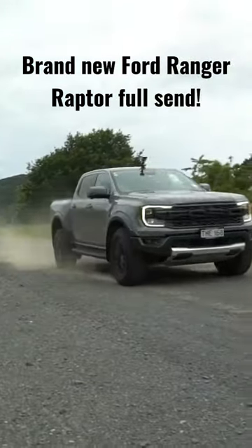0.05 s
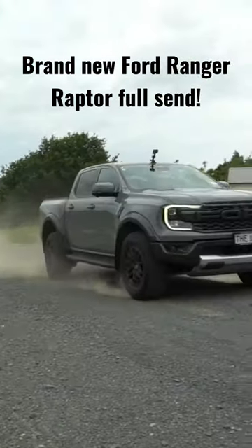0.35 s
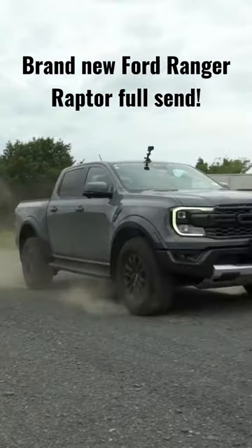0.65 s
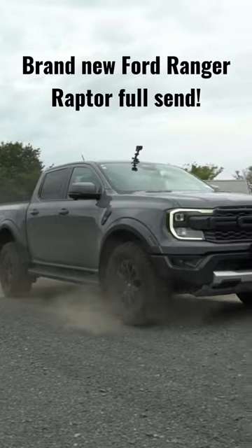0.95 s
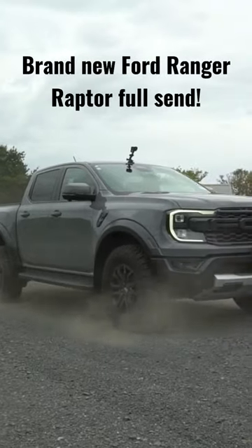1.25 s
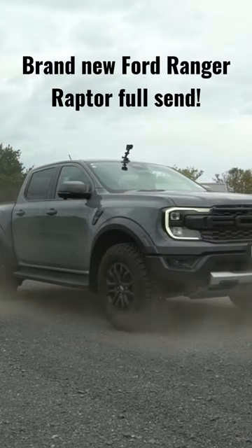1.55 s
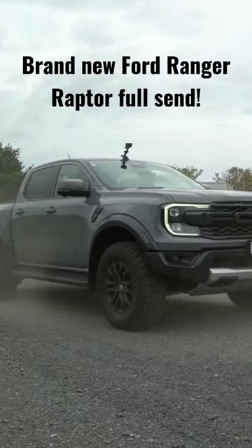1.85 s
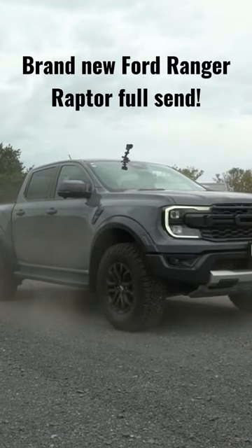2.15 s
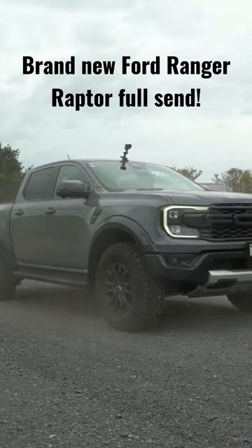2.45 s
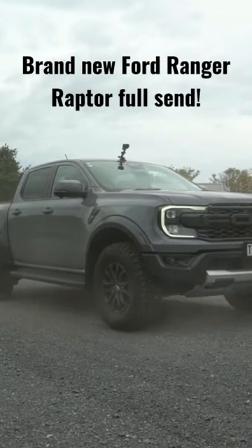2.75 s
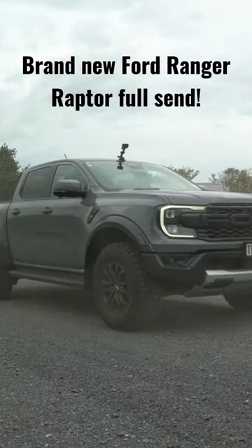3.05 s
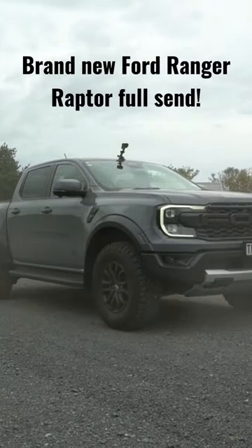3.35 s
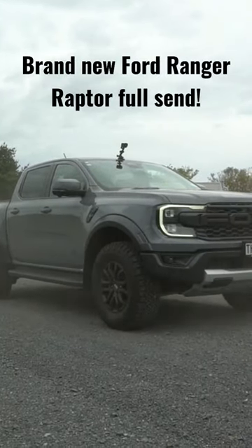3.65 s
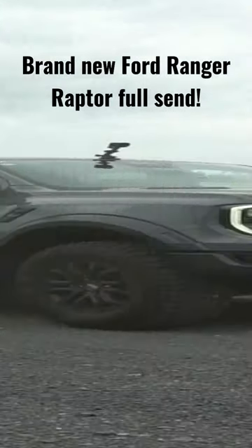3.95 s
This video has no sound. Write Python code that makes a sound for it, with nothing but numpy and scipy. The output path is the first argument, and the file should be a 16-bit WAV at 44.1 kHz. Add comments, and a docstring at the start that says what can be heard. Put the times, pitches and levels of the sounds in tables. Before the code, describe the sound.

Tyres skid on gravel with a loud, grinding crunch from the start, with stones popping underneath. Around 0.8 seconds the tread groans briefly and grit sprays. The crunch fades from about 1 second and is gone before 2 as the pickup truck stops. Its engine then idles with a quieter, throbbing hum until 4 seconds, with a soft wind rumble and very faint, distant bird chirps.

```python
"""A loud crunch of sliding gravel dies away into a throbbing idle: a pickup brakes hard in a yard.
Stones grind under the locked tyres and drive the tyre walls into resonance; the tread groans by
stick-slip, sand sprays, and single stones knock and pop as the truck settles. The six-cylinder engine
hums at harmonics of its cycle while its injectors tick. A breeze and a distant bird lie behind."""
import sys
import numpy as np
from scipy import signal
from scipy.fft import rfft, irfft
from scipy.io import wavfile
from scipy.ndimage import uniform_filter1d

SR = 44100
rng = np.random.default_rng(int(sys.argv[2]) if len(sys.argv) > 2 else 0)


def waveform_to_disk(signal):
    """Save audio, clipped to [-1, 1], as 16-bit WAV at the path in sys.argv[1]."""
    frames = np.transpose(np.atleast_2d(signal))
    scaled = np.clip(frames, -1, 1) * 32767
    samples = np.round(scaled).astype(np.int16)
    wavfile.write(sys.argv[1], SR, samples)


N = 176400

# engine speed and exhaust hum: time_s, firing_hz, level_db
ENGINE_RUN = [(0, 110.6, -38.5), (.6, 104, -66), (.92, 94, -46), (1.02, 88.1, -29.5), (1.12, 95, -37.5),
              (1.24, 106.8, -40), (1.45, 105.6, -35), (1.6, 100.1, -32.5), (2.05, 100.5, -33),
              (2.3, 98.56, -33), (2.7, 98.66, -32), (3.05, 97.9, -32.5), (3.6, 98.86, -33),
              (4, 100.2, -34.5)]
CYLINDERS = 6


def gravel():
    """Superposition of impacts: thousands of stone and grit contacts merge into a grinding noise."""
    # the slide: time_s, coarse_db, fine_db
    slide = [(0, -22, -40), (.12, -23.5, -45), (.18, -21, -43.5), (.45, -21, -42.5), (.7, -21, -44),
             (.81, -21.5, -35.5), (.88, -26, -43.5), (.97, -26, -39.5), (1.05, -30.5, -51.5),
             (1.19, -35, -58), (1.3, -40.5, -58.5), (1.5, -44, -64), (1.66, -52, -75), (1.77, -47.5, -78),
             (1.92, -54.5, -83)]
    # spectrum of coarse stones: frequency_hz, gain_db
    coarse_spectrum = [(30, -10.5), (100, -11), (200, -8), (300, -5.5), (420, -2), (550, -3), (900, -3.5),
                       (1080, -8), (1300, -6.5), (1500, -11), (1950, -11.5), (2100, -16.5), (2350, -15.5),
                       (2800, -19.5), (3450, -21), (5000, -34.5), (7000, -45.5), (8200, -45), (10000, -51),
                       (15000, -56)]
    # spectrum of fine grit: frequency_hz, gain_db
    fine_spectrum = [(300, -13), (1500, -9), (3000, 1.5), (3500, 5.5), (3850, 4), (4300, 6), (5150, -0.5),
                     (5450, -1.5), (6600, -9), (7700, -12.5), (8400, -12), (10000, -19), (13000, -16.5),
                     (15500, -20)]
    coarse_db, fine_db = curve(slide), curve(slide, axis=2)
    lurch = undb(0.47 * walk(67))  # the slide is uneven
    coarse = colour(crumble(grains(coarse_db, per_s=5000, spread_db=-0.5)), coarse_spectrum)
    fine = colour(crumble(grains(fine_db, per_s=10000, spread_db=4.5)), fine_spectrum)
    return lurch * (coarse * undb(coarse_db) + fine * undb(fine_db) + tyre_walls(coarse_db))


def tyre_walls(slide_db):
    """Forced resonance: stone contacts excite the modes of the scrubbing tyre walls, which drone."""
    # wall resonances: pitch_hz, width_hz, gain_db
    modes = [(399.5, 23.4, 3), (457, 71, -0.5), (800, 94, -16), (1280, 120, -11)]
    # strength of the drone: time_s, level_db
    scrub = [(0, -28.5), (.3, -32), (.42, -24), (.5, -31.5), (.72, -27), (.79, -25), (.84, -24),
             (.9, -32.5), (.98, -32.5), (1.06, -45), (1.2, -39.5), (1.3, -75), (1.6, -63.5)]
    slips = grains(slide_db, per_s=5000, spread_db=-0.5)
    drone = sum(undb(db) * ring(ring(slips, hz, width), hz, 3 * width) for hz, width, db in modes)
    return unit(drone) * undb(curve(scrub))


def tread_groan():
    """Stick-slip friction: the tread bites and slips in uneven cycles that slow as the wheel stops."""
    # bites of the tread: start_s, length_s, from_hz, to_hz, level_db
    bites = [(0.724, 0.1544, 456.5, 397.5, -19.5), (1.169, 0.044, 403.4, 400, -29.5)]
    out = np.zeros(N)
    jitter, flutter = 1 + 0.063 * walk(142), undb(1.5 * walk(60))
    for start, length, from_hz, to_hz, db in bites:
        progress, part = span(start, length)
        hz = (from_hz + (to_hz - from_hz) * progress) * jitter[part]
        phase = 2 * np.pi * np.cumsum(hz) / SR
        slip = np.sin(phase) + undb(-12) * np.sin(2 * phase)
        add(out, start, undb(db) * np.sin(np.pi * progress) * flutter[part] * slip)
    return out


def stones():
    """Damped impact: each larger stone gives a brief knock and a crack, muffled by the tread."""
    # stones popping under the tread: start_s, pitch_hz, level_db, knock_ms
    impacts = [(0.06, 1300, -14, 1.2), (.173, 470, -9.5, 1.6), (.192, 523, -21, 1.5),
               (0.2622, 930, -13.5, 1.6), (.263, 342, -13, 3.8), (.289, 766, -12, 1.7),
               (0.3968, 450, -9.5, 1.9), (.412, 466, -8, 2.1), (.419, 536, -8.5, 1.5),
               (0.4283, 1250, -15, 3.9), (0.4318, 646, -1.8, 1.08), (.54, 775, -13, 1.7),
               (.569, 800, -10.5, 1.9), (.6, 1220, -19, 0.86), (.785, 684, -11.5, 3),
               (0.816, 336, -17, 1.7), (.967, 457, -12, 2.2), (1.026, 533, -20, 3.2),
               (1.041, 1410, -20, 0.59), (1.096, 660, -19.5, 2), (1.1165, 1380, -17.5, 0.77),
               (1.182, 450, -23.5, 1.3), (1.214, 724, -18, 1.25), (1.2653, 1419, -25, 1.18),
               (1.2696, 850, -18.5, 1.07), (1.3045, 1280, -22.5, 0.46), (1.3905, 980, -30, 2.1),
               (1.3954, 1081, -26, 0.8), (1.574, 2000, -27.5, 0.29), (1.595, 1500, -33, 0.35),
               (1.5971, 2080, -22.5, 0.42), (1.7671, 1449, -26, 0.46), (1.7703, 1100, -38, .8),
               (1.812, 1400, -40, .6)]
    crack_hz, crack_s, crack_db, muffle_hz = 2000, 0.0031, -14, 3920
    out, t = np.zeros(N), np.arange(SR // 20) / SR
    for start, hz, db, knock_ms in impacts:
        age = t * 1000 / knock_ms
        knock = -np.sin(2 * np.pi * hz * t) * 2 * age * np.exp(1 - 2 * age)
        noise = signal.lfilter(*signal.butter(1, crack_hz, fs=SR), rng.standard_normal(len(t)))
        crack = unit(noise) * np.exp(-t / crack_s)
        add(out, start, undb(db) * (knock + undb(crack_db) * crack))
    muffled = signal.lfilter(*signal.butter(3, muffle_hz, fs=SR), out)
    return scatter(muffled, decay_s=0.014, db=-11.5)  # rattle between ground and underbody


def sand():
    """Shot noise: sand flung ahead of the wheels lands in tiny, bright random impacts."""
    # strength of the spray: time_s, level_db
    spray = [(0, -49), (.72, -66), (.81, -46), (.88, -55), (.94, -51), (1.02, -63), (1.1, -52), (1.33, -65),
             (1.5, -71), (1.8, -105)]
    # spectrum of the sand: frequency_hz, gain_db
    spectrum = [(1000, -31), (4000, 22), (7000, 8), (10000, 1), (12500, 2), (15500, -19)]
    level_db = curve(spray)
    patter = crumble(grains(level_db, per_s=900, spread_db=2.5), decay_s=.0008, db=3)
    return colour(patter, spectrum) * undb(level_db)


def chips():
    """Impact transients: small chips land nearby, each with a short tick of high noise."""
    # chips landing: start_s, level_db
    landings = [(.818, -40), (.887, -53), (.912, -40), (.942, -40), (.9655, -42), (1.078, -54),
                (1.181, -53), (1.253, -54), (1.335, -56)]
    decay_s, low_cut_hz = 0.0026, 3500
    out, t = np.zeros(N), np.arange(SR // 50) / SR
    for start, db in landings:
        add(out, start, undb(db) * rng.standard_normal(len(t)) * np.exp(-t / decay_s))
    return signal.lfilter(*signal.butter(2, low_cut_hz, "high", fs=SR), out)


def engine():
    """Periodic excitation: one slightly wavering engine cycle times exhaust, bay, injectors and valve."""
    firing_hz = curve(ENGINE_RUN)
    cycle = np.cumsum(firing_hz * (1 + 0.004 * walk(6.74))) / SR / CYLINDERS
    cycle_s = CYLINDERS / firing_hz
    return exhaust(cycle) + engine_bay(cycle) + injectors(cycle, cycle_s) + valve(cycle, cycle_s)


def exhaust(cycle):
    """Harmonic series: uneven firings hum at multiples of the cycle rate, over a resonant boom."""
    # exhaust harmonics: multiple_of_cycle_rate, gain_db
    orders = [(4, -11.5), (5, -30), (6, 0), (7, -14.5), (8, -18), (9, -24), (10, -18), (11, -36), (12, -30),
              (17, -17), (18, -31), (19, -26), (23, -32.5), (26, -33.5), (28, -32)]
    hum = 0
    for order, db in orders:
        depth = .06 if order == CYLINDERS else 0.13  # the firing tone is the steadiest
        flicker = 1 + depth * walk(6.6)
        hum = hum + undb(db) * flicker * np.sin(2 * np.pi * (order * cycle + rng.random()))
    boom = noise_band(hz=278.4, width_hz=37)
    return unit(hum) * undb(curve(ENGINE_RUN, axis=2)) + undb(-56) * boom


def engine_bay(cycle):
    """Amplitude modulation: the bay's whirr throbs at the firing rate; belt and pumps whine faintly."""
    # spectrum of the whirr: frequency_hz, gain_db
    spectrum = [(40, 8), (80, 11), (130, 6.5), (220, 1), (330, -3.5), (470, -9), (560, -21), (850, -8.5),
                (1050, -12), (1270, -15.5), (1500, -19.5), (2300, -20.5), (3200, -26), (3900, -25.5),
                (5000, -30.5), (6200, -35.5), (6800, -40.5), (10000, -43.5), (15000, -55)]
    # belt and pump whines: pitch_hz, level_db
    whines = [(468, -73), (1262, -67), (3900, -76.5)]
    throb = 1 + 0.082 * np.cos(2 * np.pi * CYLINDERS * cycle)
    whirr = colour(rng.standard_normal(N) * throb, spectrum)
    whine = sum(undb(db) * noise_band(hz, width_hz=30) for hz, db in whines)
    return undb(-43) * whirr + whine


def injectors(cycle, cycle_s):
    """Pulse train: the injectors tick twice a cycle in bursts of noise that decay exponentially."""
    # injector ticks: fraction_of_cycle, gain_db
    ticks = [(.1, -2), (.6, 2)]
    # spectrum of a tick: frequency_hz, gain_db
    spectrum = [(500, -21), (2000, 11), (4500, 13), (7000, 0), (8500, 2), (10500, 1), (13000, -0.5),
                (15500, -12)]
    rise_s, decay_s = 0.007, 0.014
    pulses = sum(undb(db) * np.exp(-((cycle - place) % 1) * cycle_s / decay_s) for place, db in ticks)
    bursts = rng.standard_normal(N) * uniform_filter1d(pulses, int(rise_s * SR))
    flicker = undb(0.92 * walk(11))
    return undb(-68) * colour(bursts * flicker, spectrum)


def valve(cycle, cycle_s):
    """Resonance: a valve rings briefly on every third engine cycle."""
    age_s, decay_s = (cycle % 3) * cycle_s, .009
    bursts = rng.standard_normal(N) * np.exp(-age_s / decay_s)
    return undb(-85.5) * unit(ring(bursts, hz=10150, width_hz=600))


def wind():
    """Turbulence: soft gusts make slow pressure fluctuations, heard as a low rumble."""
    # gusts: time_s, level_db
    gusts = [(0, -55), (1.74, -45), (1.92, -33.5), (2.15, -46), (2.7, -44.5), (2.93, -32.5), (3.08, -41),
             (3.22, -34.5), (3.4, -43), (3.6, -38), (4, -43)]
    # spectrum of the rumble: frequency_hz, gain_db
    spectrum = [(5, -27), (14, 3), (28, 0), (48, -16), (100, -24), (400, -70), (2000, -92)]
    return colour(rng.standard_normal(N), spectrum) * undb(curve(gusts))


def bird():
    """Frequency modulation: far whistles glide fastest at both ends, some with a raspy trill."""
    # bird notes: start_s, length_s, from_hz, to_hz, level_db, buzz_fraction
    notes = [(1.952, 0.07, 5050, 4800, -69.5, 0.6), (2.02, .05, 3050, 3380, -65.5, .1),
             (2.136, .106, 4550, 3480, -60, .03), (2.333, 0.036, 4430, 3150, -60, 0.1),
             (2.375, .185, 4000, 3300, -61.5, .9), (2.584, .02, 4450, 3300, -65, .1),
             (2.83, .04, 4350, 4150, -68, .2), (3.567, .055, 3000, 3340, -63, 0.22)]
    trill_hz, swing_hz, bend = 48, 170, .6
    out = np.zeros(N)
    tremble = np.sin(2 * np.pi * np.cumsum(trill_hz * (1 + 0.12 * walk(20))) / SR)
    rasp = .8 * walk(300)
    for start, length, from_hz, to_hz, db, buzz in notes:
        progress, part = span(start, length)
        trill = buzz * tremble[part]
        glide = progress + bend * np.sin(2 * np.pi * progress) / (2 * np.pi)
        hz = from_hz + (to_hz - from_hz) * glide + swing_hz * (trill + buzz * rasp[part])
        swell = np.abs(np.sin(np.pi * progress)) ** 0.14 * (1 + .5 * trill)
        add(out, start, undb(db) * swell * np.sin(2 * np.pi * np.cumsum(hz) / SR))
    return scatter(out, decay_s=0.024, db=-9)


def grains(level_db, per_s, spread_db):
    """Poisson process: contacts of random size, sparser as the level falls, at steady mean power."""
    thinning = undb(.45 * (level_db - level_db.max()))
    chance = np.minimum(per_s / SR * thinning, 1)
    size = undb(spread_db * np.minimum(rng.exponential(size=N), 5.5))
    return (rng.random(N) < chance) * size * rng.choice([-1, 1], N) / np.sqrt(chance)


def crumble(x, decay_s=0.014, db=-11.5):
    """Exponential decay: every contact trails its own short burst of noise."""
    keep = np.exp(-2 / (decay_s * SR))
    power = signal.lfilter([1 - keep], [1, -keep], x ** 2 + 1e-18)
    return x + undb(db) * np.sqrt(power) * rng.standard_normal(N)


def scatter(x, decay_s, db):
    """Scattering: a brief diffuse tail follows the direct sound."""
    t = np.arange(SR // 10) / SR
    tail = rng.standard_normal(len(t)) * np.exp(-t / decay_s)
    return x + undb(db) * signal.fftconvolve(x, tail / np.linalg.norm(tail))[:N]


def colour(x, points):
    """Minimum-phase filtering through (frequency_hz, gain_db) points, scaled to rms 1."""
    size = 2 * N
    hz, db = np.array(points).T
    bin_hz = np.maximum(np.arange(N + 1) * SR / size, 1)
    gain = undb(np.interp(np.log(bin_hz), np.log(hz), db))
    cepstrum = irfft(np.log(gain))
    cepstrum[1:N] *= 2  # folding onto positive time makes the filter causal
    cepstrum[N + 1:] = 0
    return unit(irfft(rfft(x, size) * np.exp(rfft(cepstrum)))[:N])


def ring(x, hz, width_hz):
    """A resonance with gain 1 at its centre."""
    return signal.lfilter(*signal.iirpeak(hz, hz / width_hz, fs=SR), x)


def noise_band(hz, width_hz):
    """Narrow-band noise from two resonances in series, at rms 1."""
    return unit(ring(ring(rng.standard_normal(N), hz, width_hz), hz, 2 * width_hz))


def walk(rate_hz):
    """Smooth random fluctuation: low-passed noise at rms 1."""
    bin_hz = np.arange(N // 2 + 1) * SR / N
    return unit(irfft(rfft(rng.standard_normal(N)) / (1 + (bin_hz / rate_hz) ** 4), N))


def curve(table, axis=1):
    """Linear interpolation of one table column over time."""
    rows = np.array(table)
    return np.interp(np.arange(N) / SR, rows[:, 0], rows[:, axis])


def span(start_s, length_s):
    """An event's progress from 0 to 1, and the samples it occupies."""
    first, count = int(start_s * SR), int(length_s * SR)
    return np.linspace(0, 1, count), slice(first, first + count)


def add(out, start_s, x):
    """Mix a short sound in at a time."""
    first = int(start_s * SR)
    out[first:first + len(x)] += x[:N - first]


def undb(db):
    """Decibels to gain."""
    return 10 ** (np.asarray(db) / 20)


def unit(x):
    """Scale to rms 1."""
    return x / np.sqrt(np.mean(x ** 2) + 1e-20)


def scene():
    """Superposition: all the sources in the yard sum to one channel."""
    return (gravel() + sand() + tread_groan() + stones() + chips() + engine() + wind() + bird())[None]


def record(dry):
    """Band limiting: a steep low-pass filter removes the highest treble."""
    top_hz = 15550
    return signal.sosfilt(signal.ellip(10, .1, 80, top_hz, fs=SR, output="sos"), dry)


dry = scene()
out = record(dry)
waveform_to_disk(out)
```